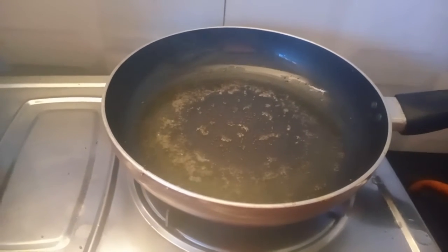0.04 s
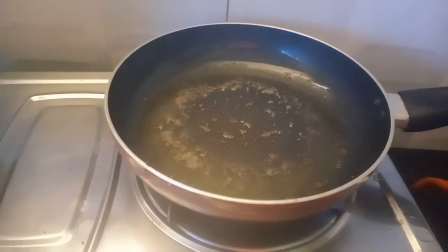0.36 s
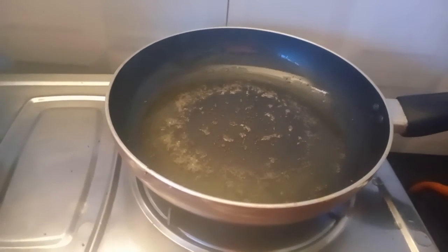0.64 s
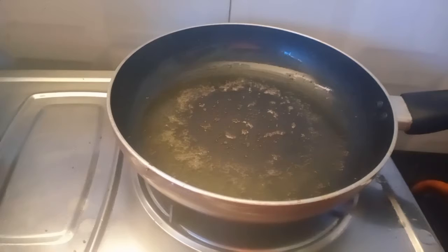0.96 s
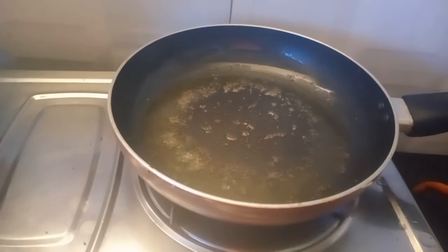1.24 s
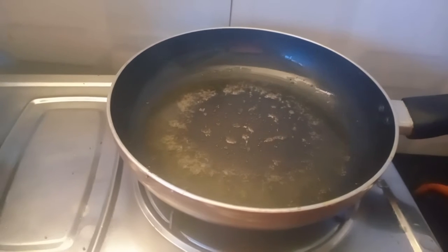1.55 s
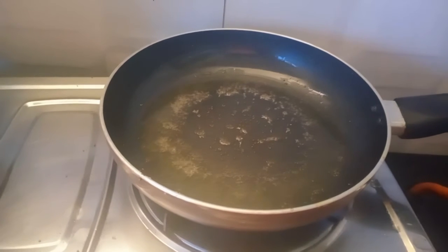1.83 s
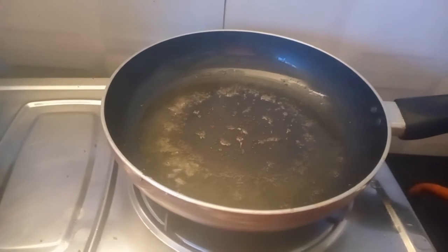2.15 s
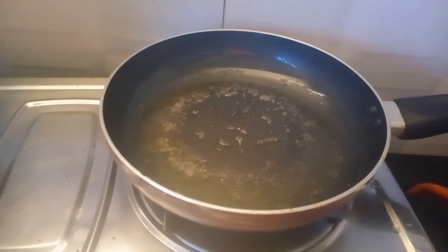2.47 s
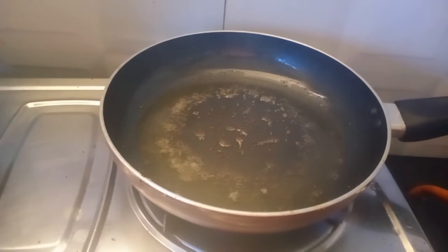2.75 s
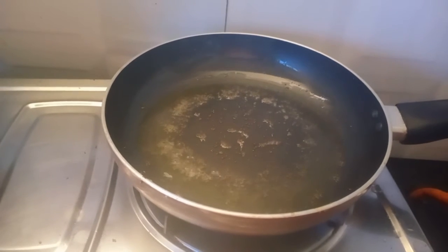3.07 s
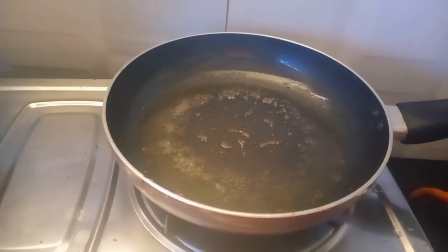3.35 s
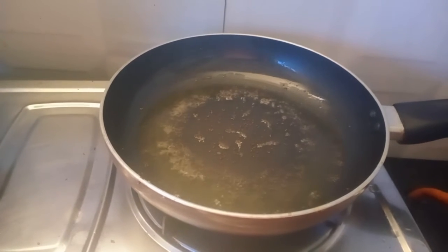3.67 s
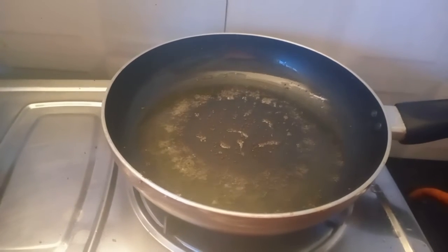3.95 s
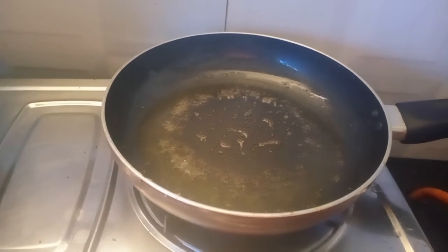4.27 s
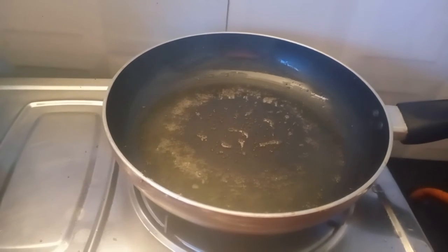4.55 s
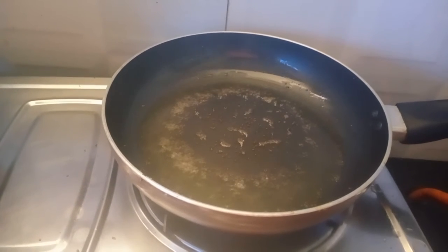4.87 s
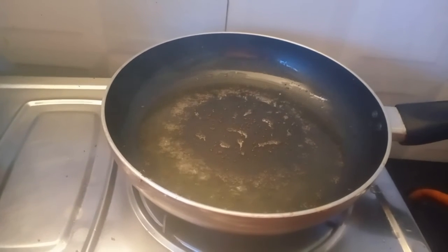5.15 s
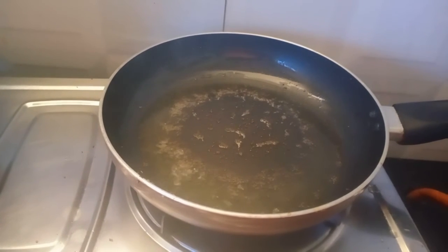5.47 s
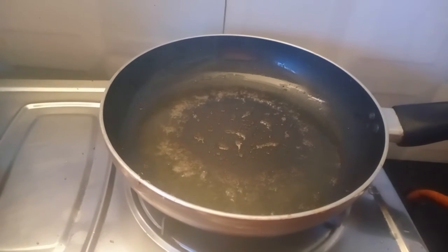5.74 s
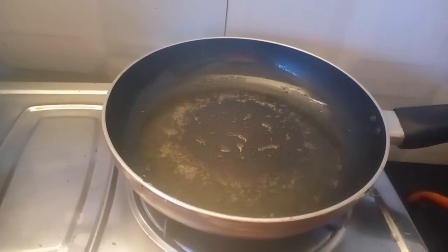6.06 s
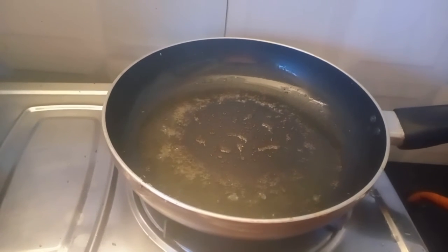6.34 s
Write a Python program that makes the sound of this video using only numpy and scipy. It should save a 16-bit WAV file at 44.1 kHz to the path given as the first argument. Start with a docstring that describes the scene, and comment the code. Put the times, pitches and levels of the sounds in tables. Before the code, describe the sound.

Close, irregular crackling and popping of seeds bursting in a pan of hot oil, with a light sizzle underneath.

```python
"""Mustard seeds splutter in hot oil in a frying pan, close to a phone in a small tiled kitchen.
Each seed bursts with a sharp crack of its husk and a pocket of steam that rings for a moment.
The pan wall, flying oil and the tiles scatter the sound, and the thrown oil lands in small spits.
Underneath, tiny bubbles fizz and the burner rushes faintly. A few dull knocks, like oil drops
landing on the microphone, come on top."""
import sys
import numpy as np
from scipy import signal
from scipy.fft import rfft, irfft
from scipy.io import wavfile

SR = 44100
rng = np.random.default_rng(int(sys.argv[2]) if len(sys.argv) > 2 else 0)


def to_wav(sig):
    """Store sig (one row per channel, or 1-D mono) as 16-bit WAV at the path in sys.argv[1].

    Samples outside -1..1 are clipped; the rate is SR.
    """
    pcm = np.clip(np.atleast_2d(sig), -1, 1) * 32767
    pcm = np.round(pcm).astype(np.int16)
    wavfile.write(sys.argv[1], SR, pcm.T)  # frames by channels


N = 287091

# Levels in the tables are relative. A ring time is how long a sound takes to fade by 60 dB.
# tone of the burner's low rush: f/Hz, level/dB
BURNER_TONE = [(25, -13), (100, 7.5), (300, 4), (800, -0.5), (2500, -11), (15000, -59)]
# echo of the kitchen, band by band: f/Hz, level/dB, ring time/s
ROOM_BANDS = [(100, 6.5, 0.34), (402, 1, 0.7), (900, 9.5, 0.27), (1980, 8.5, 0.33), (2640, 5.5, 0.39),
              (5000, 3.5, 0.44), (7800, 1.5, 0.56), (9800, 4, 0.47), (15200, 2, 0.46)]
# notes of the pan's metal, damped by the oil: f/Hz, level/dB, ring time/s
PAN_NOTES = [(1340, -22, .1), (2095, -23, .1), (2738, -20, .12), (2849, -20, .5), (4172, -26, .15),
             (7763, -26, .15)]
# notes of the air in the pan's bowl, rung by the steam pockets: f/Hz, width/Hz, level/dB
BOWL_NOTES = [(2137, 59, 6), (2650, 360, -0.5), (3130, 260, -6), (3993, 410, 4), (4560, 83, 4)]
# how the fizz swells and fades: t/s, level/dB
FIZZ_LEVELS = [(0, -35), (.26, -43.5), (.58, -42), (.9, -44.5), (1.65, -43.5), (1.82, -58), (2.15, -40),
               (2.42, -46), (3.4, -38.5), (3.53, -63), (3.78, -33.5), (4.1, -53), (4.8, -38), (5.5, -56.5),
               (6.4, -46)]
# drops on the microphone: t/s, level/dB, push direction (+1 or -1), fade time/s, left minus right/dB
MIC_DROPS = [(1.1074, -11, -1, 0.0061, 3.5), (3.6995, -21.5, 1, 0.00024, -38),
             (3.7078, -12.5, 1, .009, 5.5)]
# dry cracks, a husk splits: t/s, level/dB, brightness/(dB per octave), spray/dB, sent to the room/dB
DRY_CRACKS = [(0.04, -9.5, 1.5, -11, -13), (.066, -8, 8, -11, -10), (.289, -6, 3, -7, -4),
              (.441, -2, 5.5, -16, -4), (0.462, -4.5, 1.5, -8.5, -7.5), (0.593, -0.5, 3, -11.5, -4.5),
              (.617, -3.5, 5, -12, -11), (.622, -8, -1, -8, -16), (.731, -8.5, 6.5, -6.5, -9),
              (.793, -6.5, 4.5, -14, -7), (.816, -9, 5, 2, -3), (0.831, -6, -0.5, -13, -10),
              (.876, -12.5, 3.5, 2.5, -9), (.910, -10, 4, -4, 1.5), (1.004, -8, 9, -11, -5),
              (1.010, -7, 3, 1, -6.5), (1.078, -19, 4.5, 12.5, 3), (1.194, -3, 3, -4.5, -1),
              (1.334, -13.5, 2, -7, -20), (1.401, -7.5, 6, -11, -20), (1.439, -9.5, 5.5, -15, -16),
              (1.485, -6, 2, -3, -4.5), (1.638, -7.5, 9, -5, 0), (1.645, -11, 2.5, 1.5, 2),
              (1.852, -5, 3, -4, -6), (1.882, 0, 4, -8, -2), (1.971, -10, -1, -1, -4.5),
              (1.976, -5, 7, -10, -15), (2.069, -8, 4.5, -10, -1), (2.278, 0, 3.5, -14, -9),
              (2.353, -9, 3, -3, -1.5), (2.384, -13, 4, -2, 2), (2.490, -6, 2, -14, -3.5),
              (2.525, -10, 3, -8, -6), (2.544, -8.5, 5.5, -11, -6), (2.763, -9, 3.5, -17, -1),
              (2.791, -12.5, 5, 5, -4), (2.919, -10, 2, 6.5, 0), (2.927, -2.5, 3, -8, -9),
              (2.953, -5.5, 2.5, -5, -9), (3.000, -4.5, 3, -13, -21), (3.029, -5.5, .5, -13, -9.5),
              (3.09, -8.5, 6, -10.5, 5.5), (3.177, -3.5, 2.5, -21, -7), (3.198, -10, 3, -19, 3.5),
              (3.301, -1, 4, -10, -6.5), (3.333, 0.5, 4, -8, -2), (3.471, -8.5, 4, -2, -8),
              (3.557, -4.5, -1, -7.5, -17), (3.563, 0.5, 1.5, -24, -8.5), (3.638, -5, 2.5, -1, -1),
              (3.693, -14, 4.5, 3, -13), (3.825, -7, 4, -2.5, -4.5), (3.832, -8.5, 8, -6, -12),
              (3.889, -7, 2, -8, -21), (4.028, -6.5, 4.5, -3, -3), (4.112, -5.5, 5, 2, -1),
              (4.281, -6.5, 4, -11, -2), (4.445, -1.5, 3, -5, -3), (4.527, -3.5, 3.5, -6, -14),
              (4.545, -7, 1.5, -2, -5), (4.569, -10, 6, -10, -5), (4.609, -10, 4, -11, -2),
              (4.771, -10.5, 3, -8, -20), (4.915, -5.5, 3.5, -5.5, -10), (4.993, -2.5, 4, -3, -1.5),
              (5.11, -4, 4, -21, -15), (5.153, -2, 2.5, -10, -6), (5.247, -8, 3.5, 0.5, 0),
              (5.304, -5, -1, -15, -12), (5.402, 1.5, 3.5, -13.5, -1.5), (5.521, -10.5, 3, -6.5, -1),
              (5.639, -12, 2, -9, -1), (5.794, -4.5, 3, -6.5, -1), (5.919, -7, 3, -1.5, -2),
              (6.042, -8, 3, -8, -3), (6.137, -4.5, 4, -3, -1), (6.299, -5, 2.5, 0.5, -6.5)]
# wet pops, a crack opens a steam pocket:
# t/s, pocket level/dB, pocket f/Hz, crack level/dB, spray/dB, sent to the room/dB
WET_POPS = [(.101, 4.5, 5470, -1.5, -17.5, -5.5), (.330, -14, 5540, -12, 1.5, 0),
            (0.352, 9, 2490, -12, -3, -2.5), (.355, 3, 5860, -12, -7, 0), (.376, -1.5, 3240, -16.5, 6, -6),
            (.761, -9, 5110, -25, -11, -13), (.822, -7, 4360, -25, -11, -8),
            (1.057, -0.5, 4040, -16, -33, -20), (1.292, -3.5, 5060, -4, -5, -5.5),
            (1.583, 6.5, 3300, -6, -13, -7), (1.915, -1.5, 3200, -15, -2.5, -3),
            (2.021, -4, 6500, -13, -3.5, -6), (2.048, 3.5, 2450, -3, -7.5, -8),
            (2.207, 0, 6740, -6, -4, -4.5), (2.644, 2, 2410, -30, -6, 1.5),
            (2.658, 4, 7140, -12.5, -7.5, -1.5), (2.708, -4.5, 5240, -10, -6, -4),
            (2.851, 9, 2540, -13, -10, -9), (2.872, -6.5, 2710, -3.5, -3.5, 2.5),
            (2.966, -11, 6500, -10.5, -2, -7), (3.079, 1.5, 3170, -13, -22, -11),
            (3.134, -5.5, 8500, -9.5, -2.5, -9), (3.283, -6, 3440, -24, -2.5, -8),
            (3.379, -10, 6400, -14.5, -1.5, 0.5), (3.417, 7, 2610, -16, -10, -5),
            (3.594, -3.5, 6760, -15, -4, -0.5), (3.926, -4.5, 3480, -7.5, -4, -2.5),
            (3.934, -2, 6350, -10.5, -26, 3.5), (3.963, -1.5, 2760, -11, -6, 0),
            (4.180, -5, 4100, -16, -4, -1), (4.229, 11, 2460, -3, -8, -9.5),
            (4.354, -2.5, 3400, -6.5, -6.5, -2.5), (4.395, 1, 2410, -14, -10, -2.5),
            (4.403, -0.5, 5500, -23, -9, -6), (4.488, -3.5, 3300, -14, -2, 1.5),
            (4.503, 8, 3480, -8, -10, -29), (4.677, -0.5, 2880, -5.5, -16.5, -4.5),
            (4.875, -7.5, 5950, -25, -5, -23), (5.038, -5.5, 3150, -11, -1, -1.5),
            (5.071, .5, 3200, -19, -15, -18), (5.102, -7, 8400, -9, -8, -7),
            (5.186, 5, 2900, -22, -8.5, -2.5), (5.203, 7, 5650, -6, -9, -5.5),
            (5.376, -4, 6500, -5.5, -3.5, -4), (5.583, -3.5, 6030, -12.5, -6, -8),
            (5.671, 5.5, 2460, -28, 1.5, -8), (5.679, 0, 3140, -5.5, -5, 0), (5.746, 6, 3070, -10, -7, -14),
            (5.844, 9.5, 2970, -2.5, -7.5, -7), (6.018, -6, 3160, -18, -29, -20),
            (6.115, -2, 3230, -16, -4.5, -13), (6.219, -6, 2680, -8, -1.5, -5),
            (6.251, 1.5, 6550, -9, -15, -2), (6.442, 7.5, 3100, -22, -14, -6),
            (6.446, 1.5, 3100, -16.5, -3, -10)]
# tone of the two microphone openings: f/Hz, left level/dB, right level/dB
MIC_TONE = [(30, -9, -4.5), (94.5, -9, -8), (306, -7.5, -4), (810, -7, -5), (1250, -1, -6.5),
            (2410, -0.5, -0.5), (3070, 6, 2.5), (4720, 1.5, 0.5), (6260, 3, 4.5), (7180, 7.5, 8.5),
            (8190, -4.5, 4), (8760, -8.5, 0), (11900, -8, -3.5), (17200, -7, -10)]
# how unlike the two openings sound: f/Hz, and the stereo width at each
WIDTH_HZ = [80, 500, 1100, 2200, 4000, 6500, 8000, 9500, 12000, 14000]
WIDTHS = [0.48, 0.52, 0.43, 0.37, 0.24, 0.067, 0.12, 1.0, 0.87, 0.1]

TOP_HZ = 15750  # the phone cuts the treble above this


def gain(db):
    """Turn decibels into a factor to multiply by."""
    return 10 ** (np.asarray(db) / 20)


def unit_energy(x):
    """Scale a sound to an average energy of one per channel."""
    return x / np.sqrt(np.mean(np.sum(x ** 2, axis=-1)))


def freqs(size):
    """The frequencies in a spectrum, in Hz, never below 1."""
    return np.maximum(np.arange(size // 2 + 1) * SR / size, 1)


def curve(hz, points_hz, values):
    """Join points by straight lines, with every octave equally wide."""
    return np.interp(np.log(hz), np.log(points_hz), values)


def click_spectrum(db):
    """Spectrum of the quickest click that has this tone (minimum phase)."""
    cepstrum = irfft(np.log(gain(db)))
    half = len(cepstrum) // 2
    return np.exp(rfft(np.r_[cepstrum[0], 2 * cepstrum[1:half], np.zeros(half)]))


def shape_tone(x, points_hz, db, size=4096):
    """Turn each frequency up or down along a curve."""
    response = irfft(click_spectrum(curve(freqs(size), points_hz, db)))
    return signal.fftconvolve(x, response)[:N]


def add(out, start_s, sound):
    """Mix a sound in at a given time."""
    i = int(np.clip(start_s * SR, 0, N - 1))
    out[:, i:i + sound.shape[-1]] += sound[..., :N - i]


def stereo(mid, side, width):
    """Two close microphone openings share one sound (mid) and differ by a little of another (side)."""
    size = len(mid)
    apart = width * curve(freqs(size), WIDTH_HZ, WIDTHS)
    left_right = rfft(mid) + np.outer([1, -1], apart * rfft(side))
    return irfft(left_right / np.sqrt(1 + apart ** 2), size)


def burner(level_db=-70):
    """The flame gives a faint, steady rush."""
    mid, side = (shape_tone(noise, *np.transpose(BURNER_TONE)) for noise in rng.standard_normal((2, N)))
    return unit_energy(stereo(mid, side, width=0.92)) * np.sqrt(N) * gain(level_db)


def wall_echo(level_db=-2.46, first_s=0.0031, build_s=0.0095, size=32768):
    """Hard walls keep a sound alive for about half a second; each band fades at its own pace."""
    t, hz = np.arange(size) / SR, freqs(size)
    points_hz, levels_db, ring_times = np.transpose(ROOM_BANDS)
    noise = rfft(stereo(*rng.standard_normal((2, size)), width=0.61))
    tail = 0
    for band, db, ring_s in zip(np.eye(len(ROOM_BANDS)), levels_db, ring_times):
        band_noise = irfft(noise * curve(hz, points_hz, band))
        tail = tail + band_noise * gain(db - 60 * t / ring_s)
    build_up = 1 - np.exp(-np.maximum(t - first_s, 0) / build_s)
    return gain(level_db) * unit_energy(tail * build_up)


def pan_ring(level_db=-11, size=32768):
    """The metal of the pan answers with a faint ring."""
    t = np.arange(size) / SR
    return sum(gain(level_db + db) * unit_energy(np.sin(2 * np.pi * hz * t) * gain(-60 * t / ring_s))
               for hz, db, ring_s in PAN_NOTES)


def kitchen(sound):
    """What the walls and the pan give back for a sound from one spot in the oil."""
    mono = sound.mean(axis=0)[None]
    return signal.fftconvolve(mono, wall_echo() + pan_ring(), axes=1)[:, :N]


def bubble_ticks(per_second=2300, spread_db=3.5):
    """Tiny bubbles give bright clicks at random times, a few louder than the rest."""
    sizes = gain(spread_db * np.minimum(rng.exponential(size=N), 4))
    ticks = (rng.random(N) < per_second / SR) * sizes * rng.choice([-1, 1], N)
    return shape_tone(ticks, points_hz=[100, 1000, 3000, 7000, 15000], db=[-1, -5, -3, 3, 6])


def fizz(trim_db=-5.5):
    """Countless tiny bubbles in the oil merge into a fine sizzle."""
    bubbles = stereo(bubble_ticks(), bubble_ticks(), width=0.58)
    swell_db = np.interp(np.arange(N) / SR, *np.transpose(FIZZ_LEVELS))
    return unit_energy(bubbles) * np.sqrt(N) * gain(trim_db + swell_db)


def drop_knocks(rise_s=0.00012, low_cut_hz=81, size=4096):
    """A drop pushes on the microphone, whose bass cut turns the push into a short, swinging thud."""
    out, t = np.zeros((2, N)), np.arange(size) / SR
    for start_s, db, direction, fade_s, left_db in MIC_DROPS:
        push = np.sign(direction) * (np.exp(-t / fade_s) - np.exp(-t / rise_s))
        add(out, start_s, push * gain(db + np.array([[left_db], [-left_db]]) / 2))
    return signal.sosfilt(signal.butter(4, low_cut_hz, "high", fs=SR, output="sos"), out)


def oil_spits(throw_times, mean_flight_s=0.022, low_hz=3000, high_hz=8500):
    """List the spits: thrown oil lands a moment later as a small, bright burst of random size and pitch."""
    mean_db, spread_db = -21.5, 4.5
    brightness, spray_db, room_db = 6.0, -9.5, -2
    rows = []
    for throw_s in throw_times:
        flight_s = mean_flight_s * rng.gamma(2) / 2
        db = mean_db + spread_db * rng.standard_normal()
        hz = low_hz * (high_hz / low_hz) ** rng.random()
        rows.append((throw_s + flight_s, db, brightness, hz, db, spray_db, room_db, 0))
    return rows


def all_bursts():
    """List the dry cracks, the wet pops and one spit of oil for each of them."""
    husk_hz, husk_db = 3840, -18.5  # a dry husk holds only a trace of steam
    dry = [(start_s, db, brightness, husk_hz, db + husk_db, spray_db, room_db, 0)
           for start_s, db, brightness, spray_db, room_db in DRY_CRACKS]
    wet, left_db = [], 1.2  # wet pops sit a little to the left
    for start_s, pocket_db, pocket_hz, crack_db, spray_db, room_db in WET_POPS:
        # oil dulls the crack, the more so the louder the pocket is next to it
        brightness = 2.23 - 0.29 * (pocket_db - crack_db)
        wet.append((start_s, crack_db, brightness, pocket_hz, pocket_db, spray_db, room_db, left_db))
    return dry + wet + oil_spits([row[0] for row in dry + wet])


def scatter(spectrum, envelope, roughness, width):
    """Many small copies of a burst follow a loudness curve; together they are as strong as the burst."""
    size = len(envelope)
    mid, side = rng.standard_normal((2, size)) * envelope * np.exp(roughness * rng.standard_normal(size))
    copies = irfft(spectrum * rfft(stereo(mid, side, width)))
    return unit_energy(copies) * np.sqrt(np.sum(irfft(spectrum) ** 2))


def burst(crack_db, brightness, pocket_hz, pocket_db, puff_hz=110, puff_db=-15, size=2048):
    """Spectrum of one burst: the husk cracks, then the steam pocket rings briefly and stirs the bowl."""
    hz = freqs(size)
    octaves = np.log2(np.clip(hz, 2500, TOP_HZ) / 7000)
    crack = click_spectrum(crack_db + brightness * octaves)
    sharpness = 2.2 * np.sqrt(3000 / pocket_hz)  # small, high pockets are damped more
    pocket = 1j / (1 + 1j * sharpness * (hz / pocket_hz - pocket_hz / hz)) ** 2
    bowl = sum(gain(db) / (1 + 1j * (hz ** 2 - note_hz ** 2) / (hz * width_hz))
               for note_hz, width_hz, db in BOWL_NOTES)
    escape = gain(curve(hz, [4500, 6500], [-4.5, 0]))  # high notes leave the bowl freely
    puff = gain(puff_db) / (1 + 1j * (hz / puff_hz - puff_hz / hz))  # low puff of escaping steam
    return crack + gain(pocket_db) * (pocket * (escape + bowl) + puff)


def spluttering_seeds(spot_count=6, size=2048):
    """Each burst arrives straight, off the pan wall, then as spray and an echo from the tiles."""
    direct_db, rim_db, wall_db, spray_trim_db, tile_db = -3.5, -9, -8, 0.5, 7
    rim_s, tile_s, spray_fade_s = 0.001193, 0.0078, 0.0091
    near, spots = np.zeros((2, N)), np.zeros((spot_count, 2, N))
    t, hz = np.arange(size) / SR, freqs(size)
    wall_fade = (t > 0.0004) * np.exp(-t / 0.0018)
    spray_fade = (t > 0.0038) * np.exp(-t / spray_fade_s)
    for k, row in enumerate(all_bursts()):
        start_s, crack_db, brightness, pocket_hz, pocket_db, spray_db, room_db, left_db = row
        left_db += 0.3 * rng.standard_normal()  # bursts lie all over the pan
        rim_lag = rim_s * (1 + 0.2 * rng.standard_normal())
        tile_lag = tile_s * (1 + 0.05 * rng.standard_normal())
        source = burst(crack_db, brightness, pocket_hz, pocket_db)
        # the curved wall throws back one clear echo, which makes the burst sound hollow
        rim = gain(rim_db) * np.exp(-2j * np.pi * hz * rim_lag) / (1 + 1j * hz / 6000)
        direct = irfft(source * (1 + rim)) * gain(direct_db + np.array([[left_db], [-left_db]]) / 2)
        pan_wall = scatter(source, wall_fade, roughness=0.92, width=1.0)
        tile_bump = gain(tile_db) * (t > tile_lag) * np.exp(-np.abs(t - tile_lag) / 0.0019)
        spray = scatter(source, spray_fade * (1 + tile_bump), roughness=0.46, width=0.58)
        sound = direct + gain(wall_db) * pan_wall + gain(spray_trim_db + spray_db) * spray
        add(near, start_s, sound)
        # a few spots in the pan take turns feeding the room
        add(spots[k % spot_count], start_s, gain(room_db) * sound)
    return near, spots


def scene():
    """Seeds, fizz and their echoes reach the two microphone openings; burner and knocks are added."""
    seeds, spots = spluttering_seeds()
    sizzle = fizz()
    echoes = sum(kitchen(spot) for spot in spots) + gain(-15.5) * kitchen(sizzle)
    air = seeds + sizzle + echoes
    hz, *mic_db = np.transpose(MIC_TONE)
    heard = np.array([shape_tone(channel, hz, db) for channel, db in zip(air, mic_db)])
    return heard + burner() + drop_knocks()


def record(dry):
    """The phone cuts off the highest treble."""
    return signal.sosfilt(signal.ellip(8, 0.3, 70, TOP_HZ, fs=SR, output="sos"), dry)


dry = scene()
out = record(dry)
to_wav(out)
```